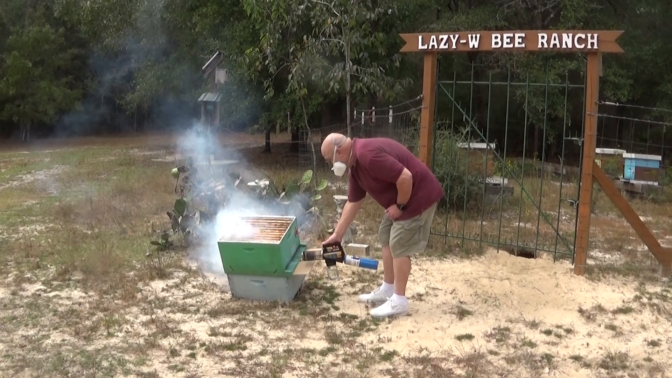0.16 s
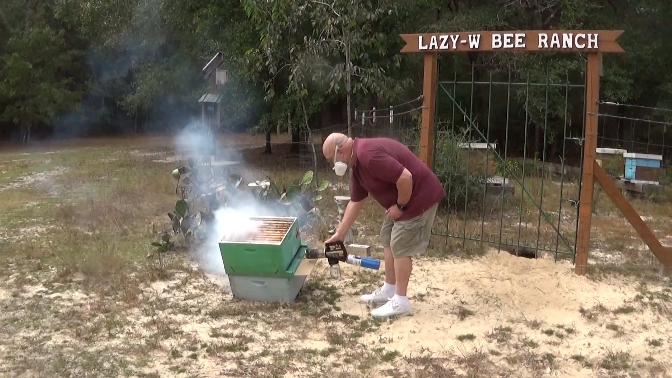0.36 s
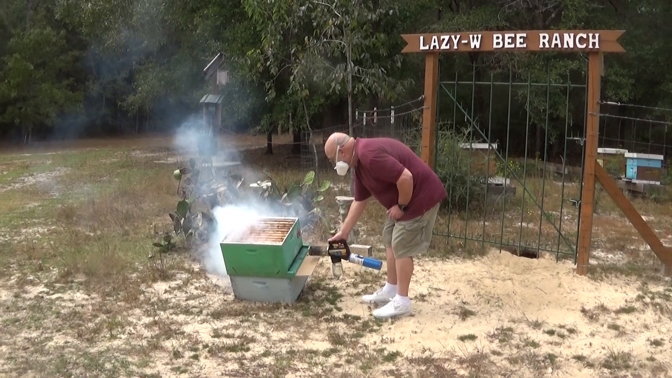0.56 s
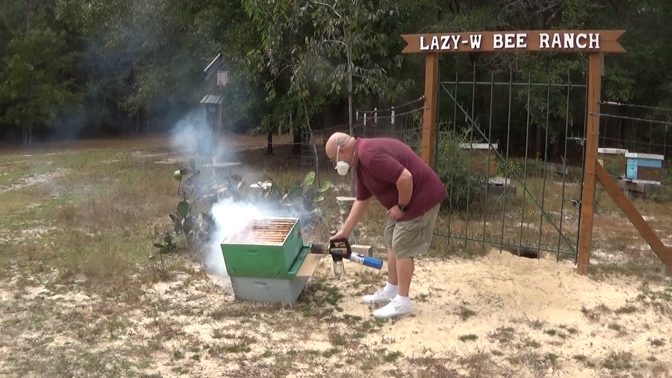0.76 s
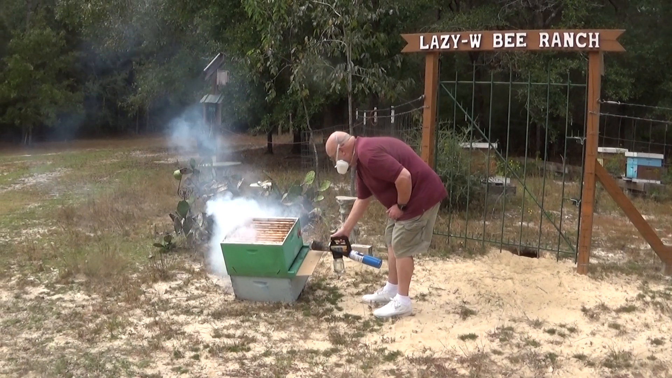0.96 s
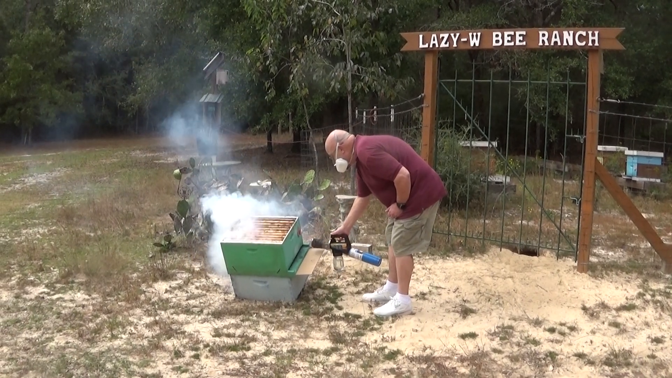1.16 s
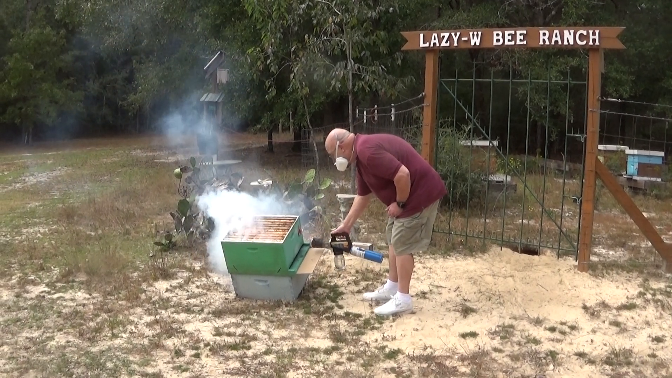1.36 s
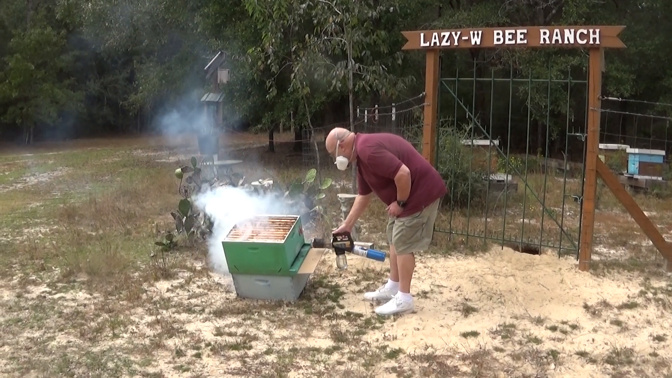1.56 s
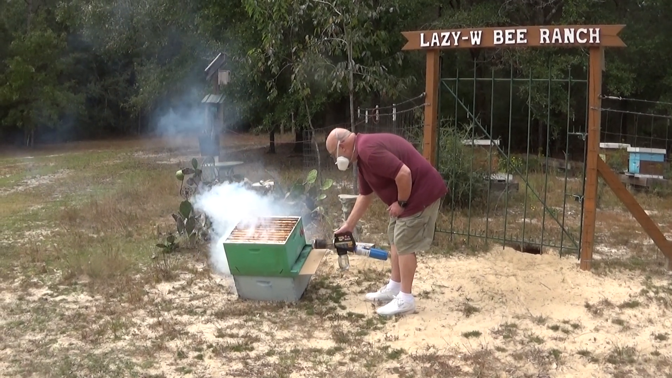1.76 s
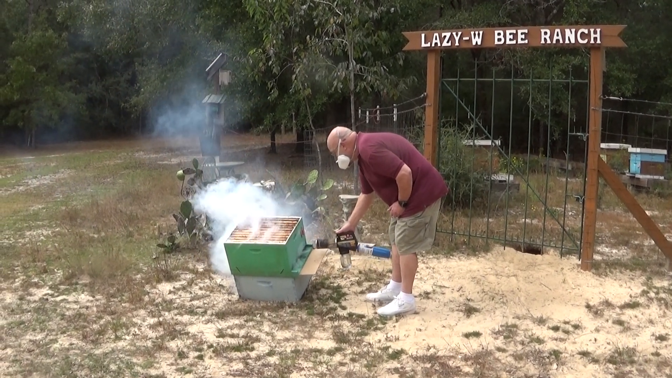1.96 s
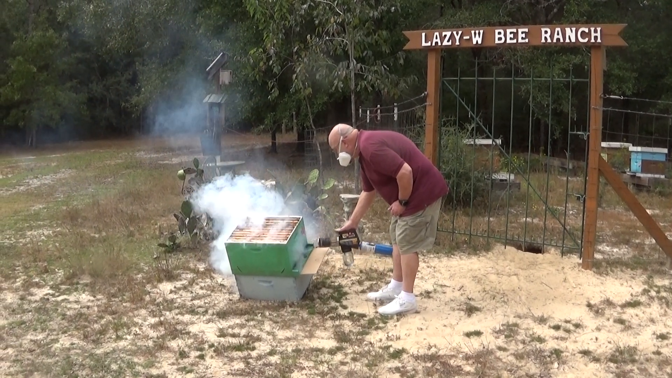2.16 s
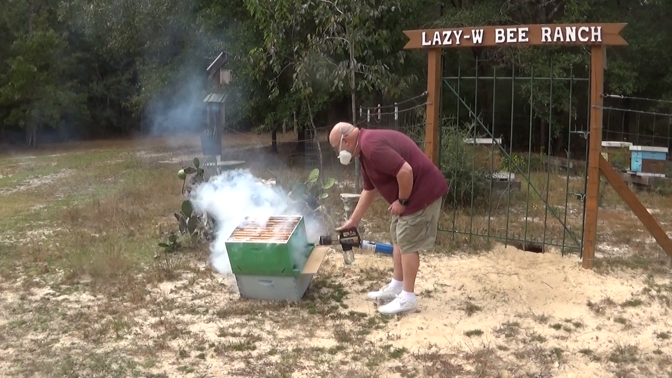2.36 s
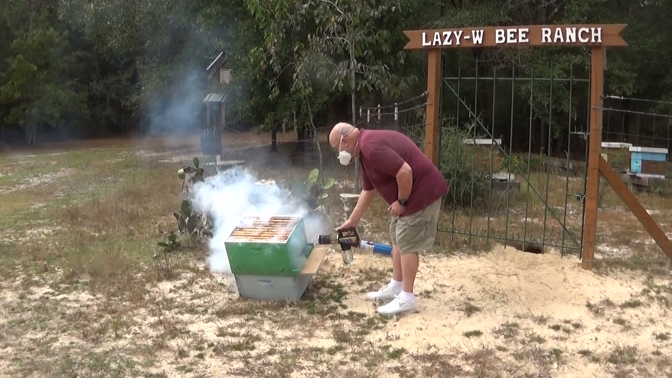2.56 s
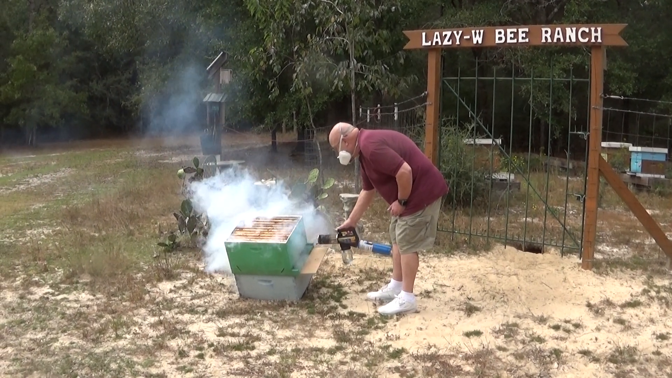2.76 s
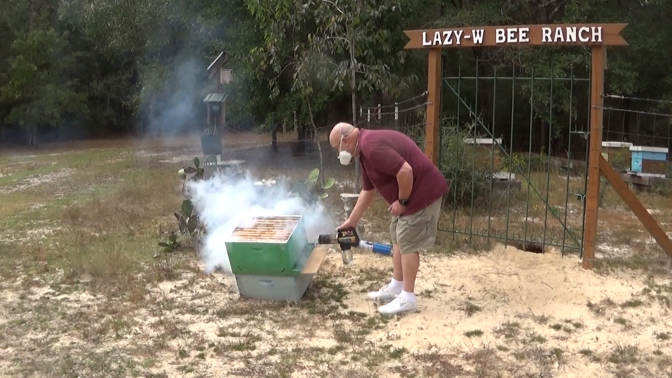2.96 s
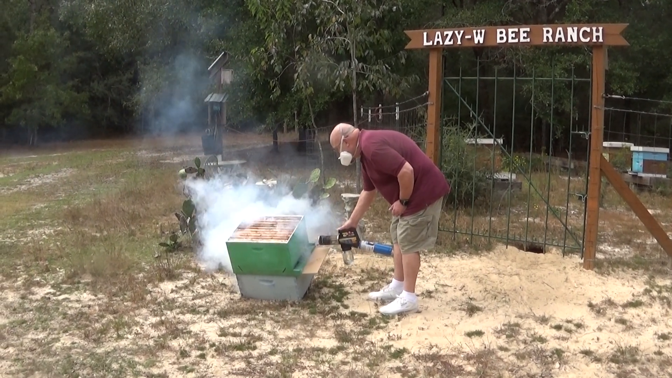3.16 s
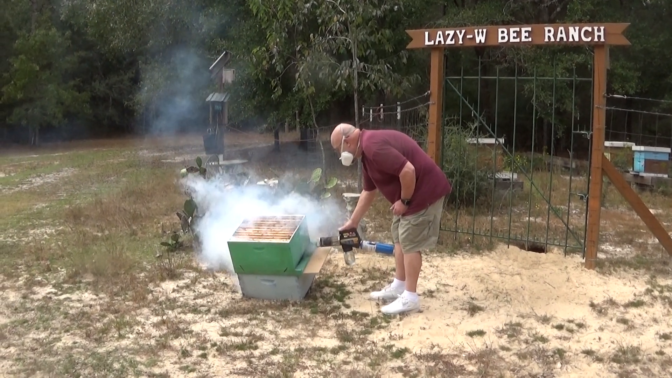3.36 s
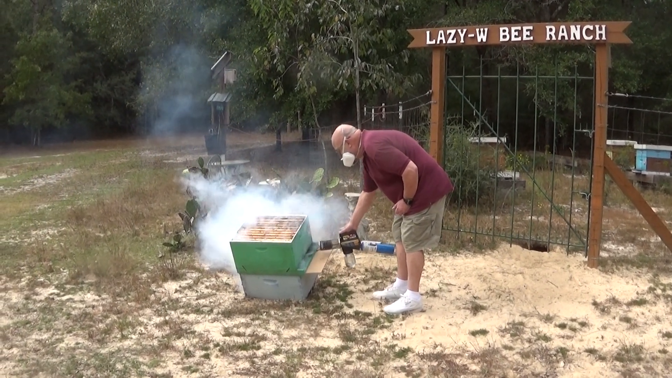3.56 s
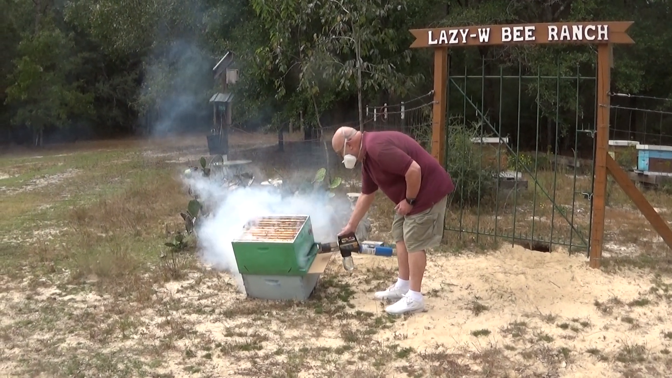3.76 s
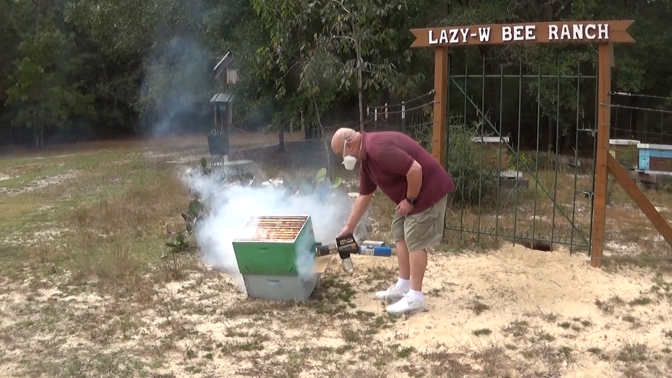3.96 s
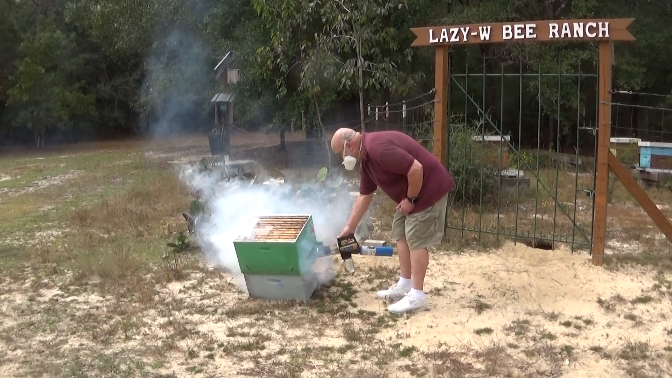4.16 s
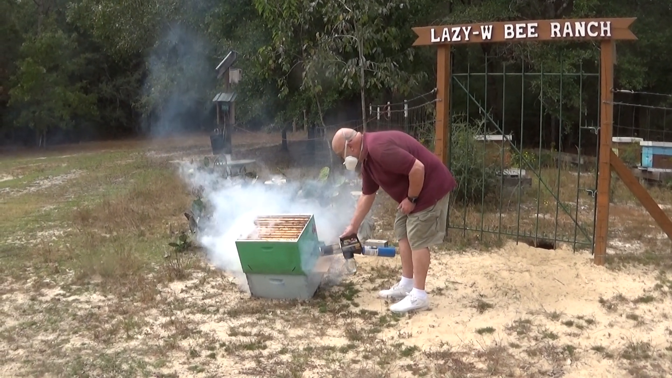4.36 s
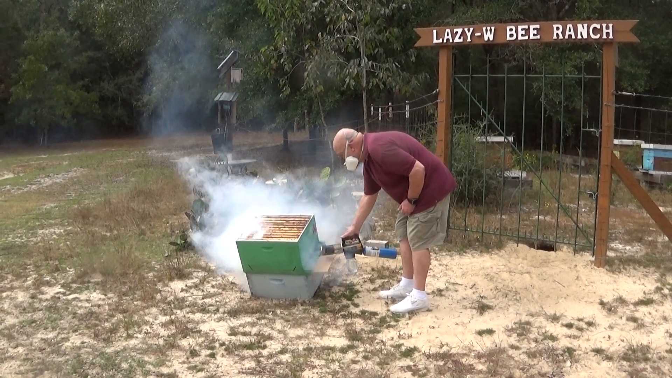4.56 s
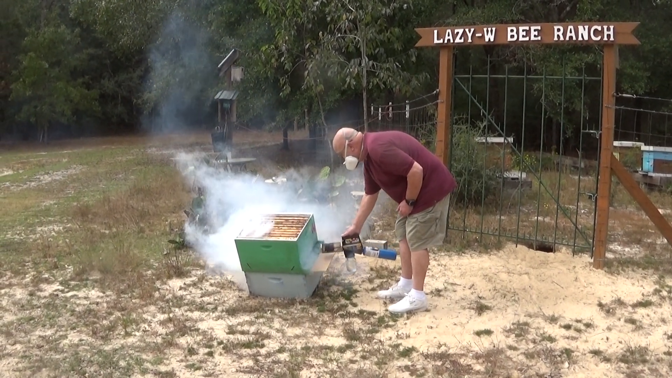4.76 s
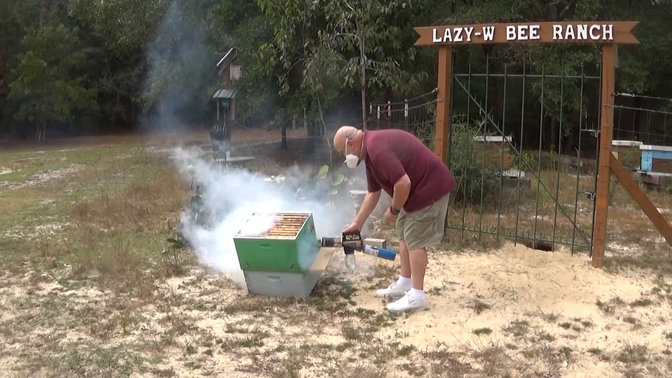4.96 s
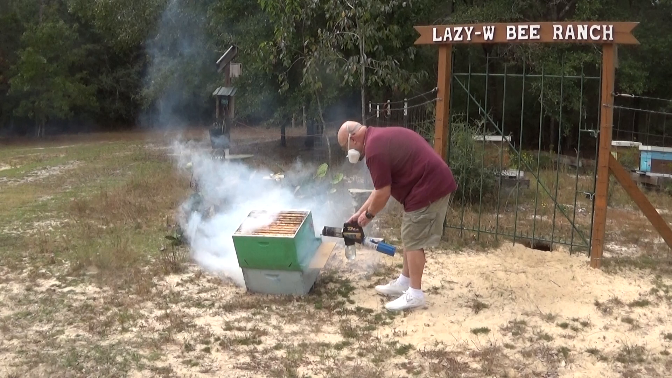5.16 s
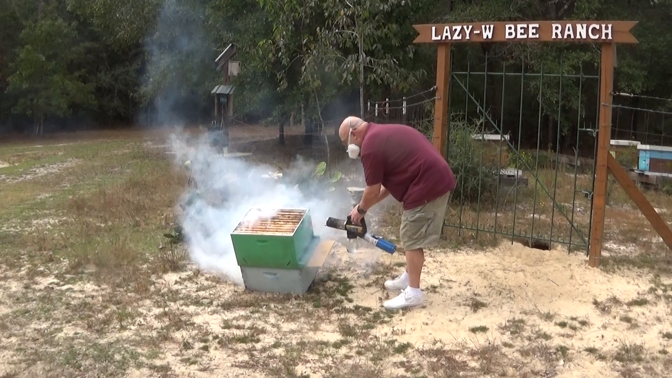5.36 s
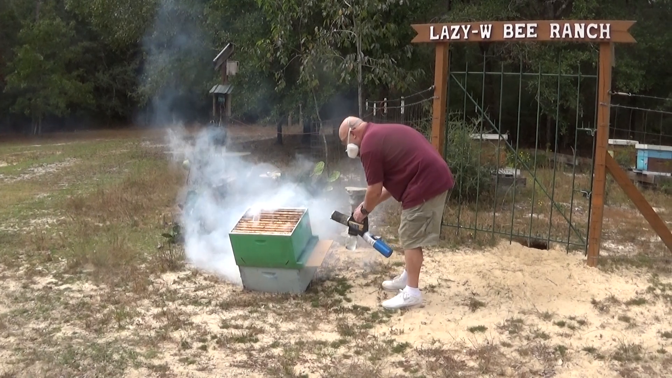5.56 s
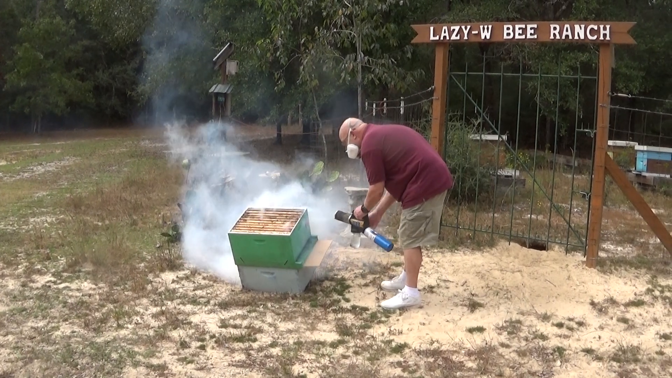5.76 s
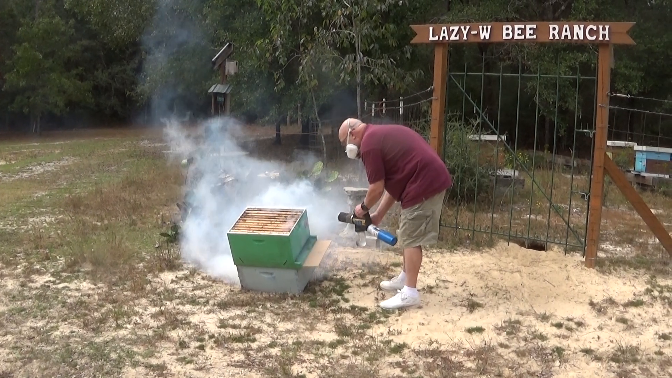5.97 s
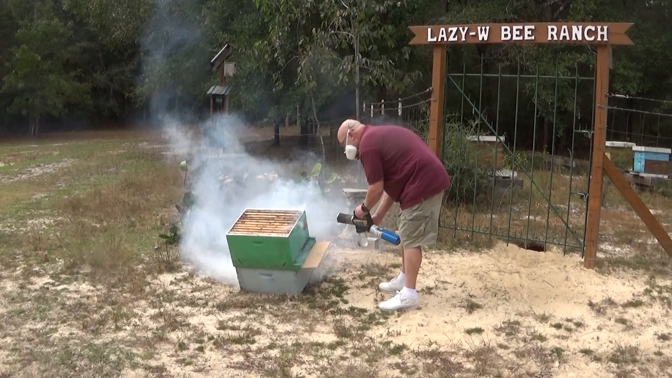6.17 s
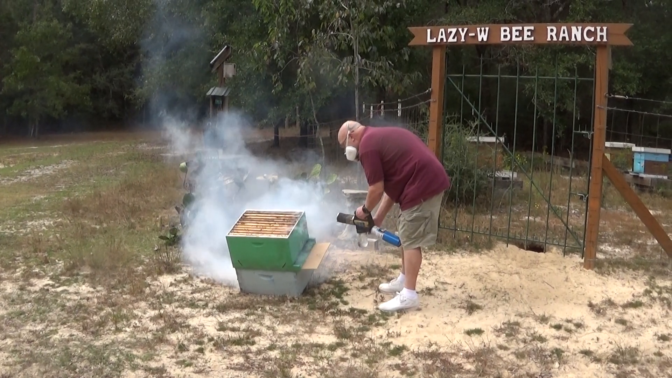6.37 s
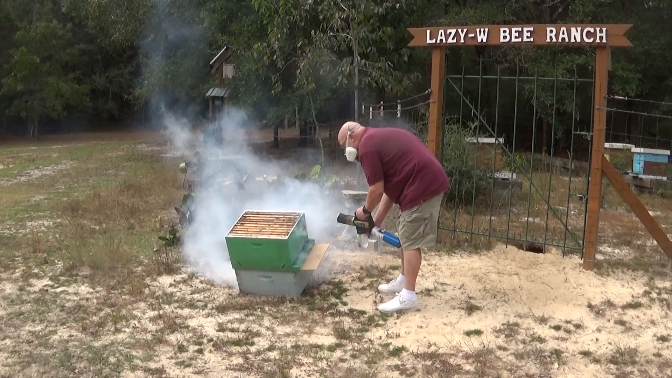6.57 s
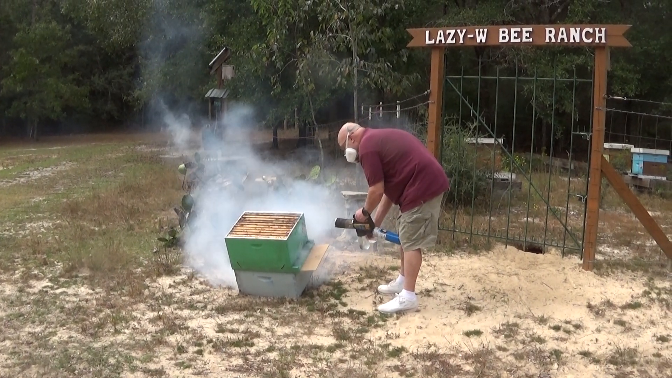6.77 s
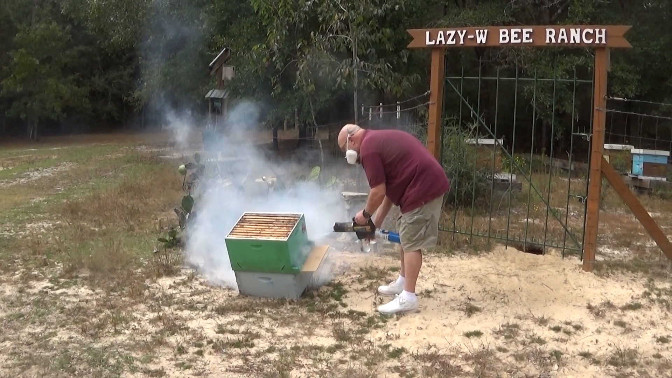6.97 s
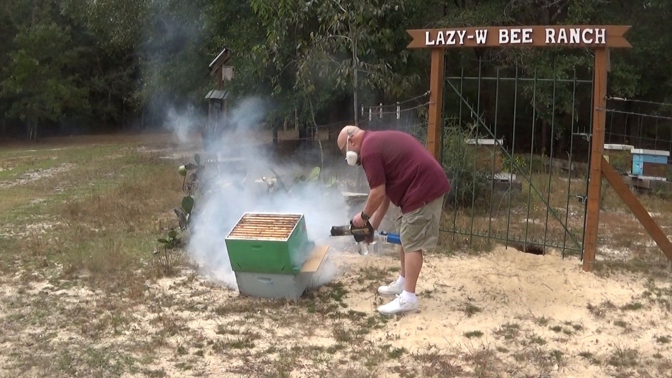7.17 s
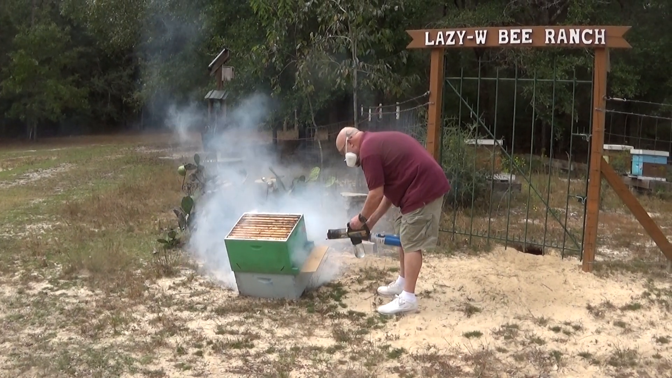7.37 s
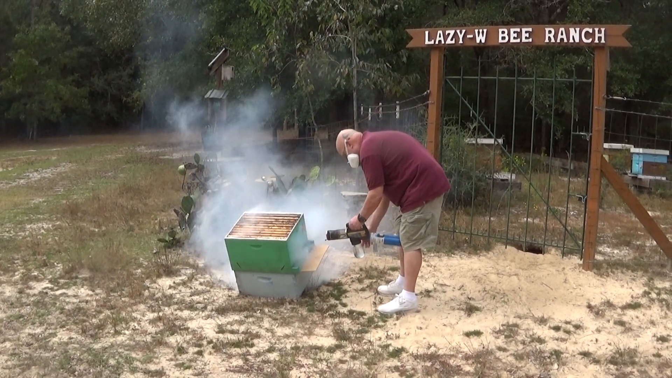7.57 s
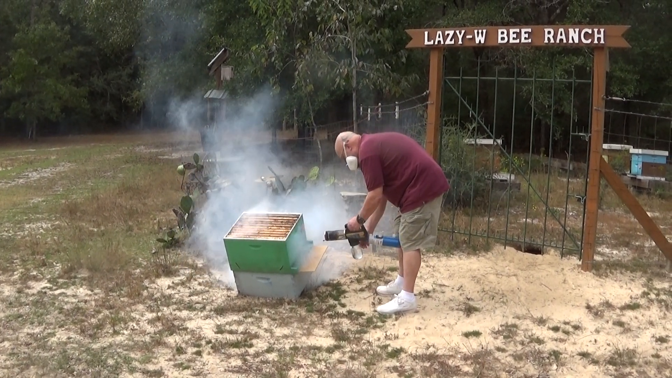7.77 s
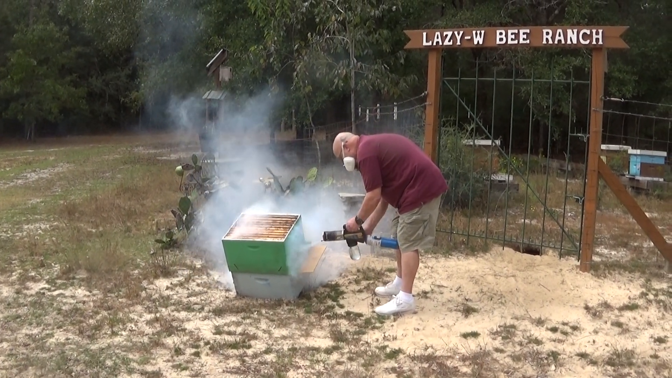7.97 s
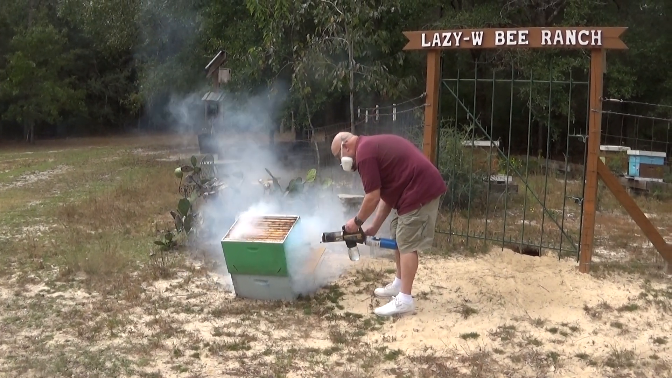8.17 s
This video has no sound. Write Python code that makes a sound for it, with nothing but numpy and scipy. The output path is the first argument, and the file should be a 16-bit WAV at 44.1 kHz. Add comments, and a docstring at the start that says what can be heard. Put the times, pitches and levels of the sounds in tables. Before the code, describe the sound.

A handheld fogger spits loud, hissing jets of hot fog into a hollow wooden hive box, a thin burner whistle trembling throughout outdoors.

```python
"""Thermal fogger at a wooden hive box

Outdoors, a handheld fogger blows hot oil fog into a hive box, then is drawn back from it.
Each pump stroke flashes to a hissing, spitting jet of filtered noise; the hollow box booms with it as resonances.
The burner whistles throughout as a trembling near sine, and bees hum as wavering wing beats with overtones.
Around them the yard is a faint wide wash of noise, unrelated on the two sides, over the flame's low flutter."""
import sys
import numpy as np
from scipy import signal
from scipy.io import wavfile
from scipy.ndimage import map_coordinates

SR = 44100
rng = np.random.default_rng(int(sys.argv[2]) if len(sys.argv) > 2 else 0)


def makeup_ratio(level_db):
    """Linear amplitude ratio for a level in decibels (20 dB per factor of ten)."""
    decades = np.asarray(level_db, float) / 20
    return 10 ** decades


def unload_audio(sound):
    """Save the sound as a 16-bit wav file, at the path given as the first command line argument."""
    columns = np.transpose(np.atleast_2d(sound))
    # keep every value between -1 and 1, then stretch to whole-number steps
    steps = np.round(np.clip(columns, -1, 1) * 32767)
    wavfile.write(sys.argv[1], SR, steps.astype(np.int16))


N = 362938  # samples

# where the nozzle is: start_s, face_echo_ms (off the box), ground_echo_ms, inside_share (1 in the box, 0 out)
NOZZLE_PLACE = [(0, .53, 2.0, 1), (.35, .53, 2.0, 1), (.5, .37, 2.0, 1), (1.0, .37, 2.0, 1),
                (2.0, .53, 2.01, 1), (2.5, .53, 2.015, 1), (2.85, .37, 2.0, 1), (3.6, .37, 2.0, 1),
                (3.8, .61, 2.005, .9), (5.0, .64, 2.02, .85), (5.3, .97, 2.05, .55), (6.3, .98, 2.085, .3),
                (6.8, .93, 2.07, .3), (7.5, .83, 2.03, .05), (8.23, .825, 1.9, 0)]


def rms_one(x):
    """Scale to unit rms."""
    return x / np.sqrt(np.mean(x ** 2) + 1e-20)


def in_time(rows):
    """Columns of a table against its seconds, one value per sample."""
    s, *columns = np.transpose(rows)
    return [np.interp(np.arange(N) / SR, s, c) for c in columns]


def drift(rate_hz):
    """Slow chance: noise through a double one-pole low-pass, run in; spread 1."""
    step = 8  # samples between drawn values
    r = np.exp(-2 * np.pi * rate_hz * step / SR)
    noise = rng.standard_normal(N // step + 4002)
    slow = signal.lfilter([1], [1, -2 * r, r * r], noise)[4000:]
    return np.interp(np.arange(N) / step, np.arange(len(slow)), rms_one(slow))


def resonance(x, hz, width_hz):
    """Two-pole resonance with a gain of about 1 on top."""
    r = np.exp(-np.pi * width_hz / SR)
    top = np.array([1, 0, -1]) * (1 - r * r) / 2
    return signal.lfilter(top, [1, -2 * r * np.cos(2 * np.pi * hz / SR), r * r], x)


def lift(x, modes, share=1):
    """Each mode raises its own neighbourhood of the spectrum."""
    for hz, width_hz, db in modes:
        x = x + share * (makeup_ratio(db) - 1) * resonance(x, hz, width_hz)
    return x


def turbulence(spectrum, gain_db, patchy_db, count=3, channels=1):
    """Bands of noise, about count to the octave; each takes gain_db(hz) in time and flickers on its own."""
    hz_points, db_points = np.transpose(spectrum)
    octaves = np.log2(hz_points[-1] / hz_points[0])
    edges = np.geomspace(hz_points[0], hz_points[-1], int(count * octaves) + 3)
    # neighbouring bands are cut from unrelated noises
    white = rng.standard_normal((2, channels, N))
    flat, out = 0, 0
    for k, (low, high) in enumerate(zip(edges, edges[1:])):
        band_pass = signal.butter(2, [low, high], "band", fs=SR, output="sos")
        band = signal.sosfilt(band_pass, white[k % 2])
        hz = np.sqrt(low * high)
        band = band * makeup_ratio(np.interp(np.log(hz), np.log(hz_points), db_points))
        flat = flat + band
        out = out + band * makeup_ratio(gain_db(hz) + patchy_db * drift(4.15))
    # the steady spectrum has unit rms ahead of the gains
    return out / np.sqrt(np.mean(flat ** 2))


def delayed(x, ms):
    """Read a sound late by a fixed or changing time."""
    return map_coordinates(x, [np.arange(N) - ms * SR / 1000], order=3)


def flow_db():
    """Each stroke rises, holds and fades steadily in dB; stroke powers add up over the idling hiss."""
    # pump strokes and surges of oil: start_s, rise_s, hold_s, level_db, fade_db_per_s
    strokes = [(-0.195, 0.106, 0.054, -30.5, 7), (0.015, 0.097, 0.067, -21, 11.5),
               (0.177, 0.095, 0.19, -20.1, 64), (0.551, 0.06, 0.038, -26.5, 57),
               (0.847, 0.14, 0.017, -32, 56), (1.292, 0.11, 0.11, -22.5, 6.5),
               (1.459, 0.13, 0.43, -22.7, 29), (1.713, 0.043, 0.03, -20.5, 103),
               (2.481, 0.503, 0.077, -29, 9), (3.28, 0.25, 0.084, -19, 28), (3.7, 0.066, 0.02, -22.5, 60),
               (3.6, 0.36, 0.29, -20.9, 17), (4.065, 0.031, 0.005, -22, 14.5),
               (4.433, 0.177, 0.233, -30, 31), (4.962, 0.074, 0.064, -32.5, 24),
               (5.878, 0.28, 0.162, -43, 4), (6.621, 0.41, 0.027, -35, 7), (7.697, 0.043, 0.015, -35.5, 62),
               (7.754, 0.085, 0.719, -26.5, 16)]
    idle_db, rise_power = -44.3, 2.2
    t = np.arange(N) / SR
    power = makeup_ratio(2 * idle_db)
    for start, rise, hold, db, fade_db in strokes:
        up = np.clip((t - start) / rise, 0, 1) ** rise_power
        fading_s = np.maximum(t - start - rise - hold, 0)
        power = power + up * makeup_ratio(2 * (db - fade_db * fading_s))
    return 10 * np.log10(power)


def jet():
    """Boiling oil leaves in uneven slugs: one sputter shakes hiss, roar and boom, each by its own share."""
    # turbulence at the nozzle: pitch_hz, level_db (relative, per Hz)
    hiss_spectrum = [(2500, -15.5), (3600, -12), (4300, -10), (5750, -5), (6700, -5), (7700, 0),
                     (10000, -0.5), (12500, 0), (14000, -1.5), (15300, -9), (17500, -10)]
    # spreading plume: pitch_hz, level_db (relative, per Hz)
    roar_spectrum = [(700, -20), (1000, -2), (1500, -3), (2000, 1.5), (2600, -1.5), (3400, 1), (4500, -9.5)]
    # low noise that sounds the hollow box: pitch_hz, level_db (relative, per Hz)
    boom_spectrum = [(100, -26), (140, -10.5), (200, -5), (330, -14), (500, 2.5), (800, 2), (1200, -12.5)]
    # air modes of the box: pitch_hz, width_hz, lift_db (nozzle fully inside)
    box_modes = [(248.4, 25.4, 14.5), (413, 28, 6.5), (900, 63, 5), (1140, 170, 3), (1564, 220, 5.5),
                 (2124, 140, 3)]
    # tube resonances of the nozzle: pitch_hz, width_hz, lift_db
    nozzle_modes = [(6470, 160, 3), (9000, 350, 2), (10400, 500, 2.5), (12300, 500, 1.5)]
    # slugs of unboiled oil: start_s (their middle), extra_roar_db, length_s
    slugs = [(0.172, 5.5, 0.048), (0.36, 5, .045), (0.53, 5, .045), (0.757, 0.5, 0.033), (0.902, 1.5, .04),
             (1.51, 7.5, 0.049), (1.644, 8, 0.049), (1.796, 5, 0.029), (2.027, 4, .035), (3.065, 4, .06),
             (3.55, 5, .03), (3.648, 4.5, 0.03), (4.87, 1, 0.049), (6.983, 2, .04), (7.927, 1.5, 0.039),
             (8.013, 4, .035), (8.22, -1, 0.04)]
    # the fog: start_s, wetness_db, box_filling_db, hump_hz (loudest pitch of the hiss)
    fog = [(0, -1.5, 3.5, 10600), (.45, -1.5, -2.5, 9500), (.85, 2, -3.5, 9900), (1.25, 2.5, 0.5, 10600),
           (1.45, -1, -2, 10100), (1.9, -1, 3.5, 10400), (2.4, -5, 4, 10700), (2.8, 0, -1, 10030),
           (3.3, -1.2, -3, 9500), (3.7, -3, 0, 9500), (3.8, 2, 6.5, 12300), (4.4, 0, 4.5, 12100),
           (4.85, -2, 7, 12000), (5.15, -5.5, -2, 12100), (5.45, -1.5, 0, 9500), (6.0, -3, -2, 10340),
           (6.85, -4, -.7, 10100), (7.05, -.7, 1, 9800), (7.5, -4, 5, 10300), (7.8, -3, -1.5, 9300),
           (7.95, 2.3, -0.5, 9300), (8.23, 4.2, 3, 9700)]
    # the nozzle swings about: start_s, tilt_db_per_octave (hiss brightness), hump_db (height of the hump)
    aim = [(0, -7.5, 3), (.11, -0.7, 1), (.45, -3, 4), (.65, 0.2, 4.5), (.85, -3, 3), (1.05, .3, 2.5),
           (1.22, -1.5, 4.5), (1.4, -0.5, 5.5), (1.95, -1.1, 1.5), (2.25, -2.2, 6.5), (3.0, 0, 4.5),
           (3.55, -0.1, 1), (3.8, -2.5, 0.5), (4.26, -1.2, 3), (4.95, -2.5, 3.5), (5.15, 2, .7),
           (5.5, 0, 4), (5.9, -0.3, 4), (6.6, -1.2, 3), (6.92, 0, 6.5), (7.5, -4.5, 2.5), (7.86, -2, 0),
           (8.23, -5, 3.5)]
    # levels at the usual hiss, and the share of the hiss swing that roar and boom follow
    usual_db, roar_level_db, boom_level_db = -28, -44, -53.5
    roar_follows, boom_follows = 0.69, 0.52
    # for each dB of a slug: dB of hiss, dB of boom, dB per octave lost by the hiss
    slug_hiss, slug_boom, slug_dulls = 0.037, .55, 0.43
    # roar tilt in dB per octave, nozzle in and out of the box; tilt lost per dB of filling
    tilt_in, tilt_out, fill_deepens = 0.55, 3.5, 0.74
    box_heard_out = .15  # share of the box modes heard with the nozzle out

    t = np.arange(N) / SR
    hiss_db = flow_db()
    swing_db = hiss_db - usual_db
    slug_db = sum(db * np.exp(-((t - s) / length) ** 2) for s, db, length in slugs)
    wet_db, fill_db, hump_hz = in_time(fog)
    aim_tilt, hump_db = in_time(aim)
    inside = in_time(NOZZLE_PLACE)[2]
    hiss_db = hiss_db + slug_hiss * slug_db
    roar_db = roar_level_db + roar_follows * swing_db + wet_db + slug_db
    boom_db = boom_level_db + boom_follows * swing_db + fill_db + slug_boom * slug_db
    hiss_tilt = aim_tilt - slug_dulls * slug_db
    roar_tilt = tilt_out + (tilt_in - tilt_out) * inside - fill_deepens * fill_db
    sputter = 0.39 * drift(14.5) + .5 * drift(39.0) + 0.77 * drift(670.0)

    def hiss_colour(hz):
        """The tilt turns about a fixed pitch; a narrow hump wanders through the treble."""
        hump = hump_db * np.exp(-(np.log2(hz / hump_hz) / 0.12) ** 2)
        return hiss_db + .72 * sputter + hiss_tilt * np.log2(hz / 8960.0) + hump - .9

    def roar_colour(hz):
        """The plume brightens and dulls with the nozzle's place and the filling of the box."""
        return roar_db + 1.1 * sputter + roar_tilt * np.log2(hz / 1770.0)

    hiss = lift(turbulence(hiss_spectrum, hiss_colour, 1.0, count=6), nozzle_modes)
    roar = turbulence(roar_spectrum, roar_colour, 0.9, count=4)
    boom = turbulence(boom_spectrum, lambda hz: boom_db + 0.15 * sputter, 1.36)
    box_share = box_heard_out + (1 - box_heard_out) * inside
    in_box = lift(roar + boom, box_modes, box_share)
    return (hiss + makeup_ratio(-1.5) * in_box)[0]


def spits():
    """Drops crack, fizz out and knock the barrel; small ones crackle at random, as loud as the flow allows."""
    # drops that spit: start_s, crack_db (relative), fizz_ms (decay), knock_db (relative)
    drops = [(4.1522, -4, .3, -40), (4.4748, -10, .3, -35), (6.3795, -11.5, 1.2, -24.5),
             (6.599, -30, 1.2, -32), (6.9995, -13, .5, -34), (7.7445, -17, 4.0, -36),
             (7.7995, -14, .6, -40), (7.834, -16, 2.5, -40), (7.8628, -7, 2.5, -30), (7.8798, -2, .4, -34),
             (8.007, -10, .6, -30)]
    # colour of a crack: pitch_hz, width_hz, level_db
    crack_colour = [(4500, 2000, -4), (8000, 3000, 0), (12500, 3500, -2)]
    # ring of the barrel: pitch_hz, width_hz, level_db
    barrel = [(910, 210, -14.5), (1900, 430, -3.5)]
    noise = rng.standard_normal((len(drops), 800))
    t_ms = np.arange(800) / SR * 1000
    # about 80 small drops a second, either sign
    falls = rng.random(N) < 80.0 / SR
    size_db = 3.0 * np.minimum(rng.exponential(1, N), 2)
    small = falls * makeup_ratio(size_db) * rng.choice([-1, 1], N)
    burst = small * makeup_ratio(flow_db() + 11)
    blows = np.zeros(N)
    for (s, db, ms, knock_db), grain in zip(drops, noise):
        start = round(s * SR)
        burst[start] += makeup_ratio(db + 7)
        burst[start:start + len(t_ms)] += makeup_ratio(db - 3) * np.exp(-t_ms / ms) * grain
        # the knock follows one fizz time later
        blows[start + round(ms * SR / 1000)] = makeup_ratio(knock_db)
    out = np.zeros(N)
    for k, (hz, width_hz, db) in enumerate(crack_colour):
        out += makeup_ratio(db) * resonance(burst + 1e-18, hz, width_hz) * (-1) ** k
    for hz, width_hz, db in barrel:
        # a resonance answers a click with a height of about 2 pi width / SR
        out += makeup_ratio(db) * resonance(blows + 1e-18, hz, width_hz) * SR / (2 * np.pi * width_hz)
    return out


def reflections(x):
    """Bounces off the wooden face and the ground comb the jet as the nozzle moves; fence and trees scatter it."""
    face_in, face_out, ground = .21, .72, .2  # echo shares; face with the nozzle in and out of the box
    face_ms, ground_ms, inside = in_time(NOZZLE_PLACE)
    face = face_out + (face_in - face_out) * inside
    # a dull bounce off the small face, which the bass passes round, and a thin one off the ground
    dull_band = signal.butter(1, [700, 5000], "band", fs=SR, output="sos")
    thin_band = signal.butter(1, [2000, 9000], "band", fs=SR, output="sos")
    face_echo = face * delayed(signal.sosfiltfilt(dull_band, x), face_ms)
    ground_echo = ground * delayed(signal.sosfiltfilt(thin_band, x), ground_ms)
    centre = (x + face_echo + ground_echo) / np.sqrt(1 + face ** 2 / 2)
    # fence and trees answer from the sides, opposite in sign left and right
    far_band = signal.butter(4, [2200, 9500], "band", fs=SR, output="sos")
    far = signal.sosfilt(far_band, x)
    scatter = makeup_ratio(-25 + 2.0 * drift(9.2)) * (delayed(far, 7.3) - delayed(far, 11.9))
    return np.array([centre + scatter, centre - scatter])


def whistle():
    """An edge tone: a near sine, trembling in pitch and strength, with a weak octave and a skirt of breath."""
    # burner whistle: start_s, pitch_hz, level_db (relative)
    burner = [(0, 3240, -41), (.45, 3225, -45), (.75, 3285, -40), (.94, 3260, -43), (1.03, 3335, -41),
              (1.08, 3305, -41), (1.15, 3345, -41), (1.24, 3265, -40), (1.46, 3248, -39), (1.6, 3265, -41),
              (1.85, 3270, -37), (2.03, 3325, -37), (2.12, 3290, -38), (2.4, 3300, -38), (2.7, 3262, -39),
              (3.37, 3265, -39.5), (3.82, 3330, -41.5), (4.0, 3290, -41.5), (4.35, 3285, -37.5),
              (4.6, 3305, -40), (4.86, 3332, -38.5), (5.1, 3275, -35), (5.24, 3320, -35), (5.36, 3285, -40),
              (5.44, 3250, -37), (5.72, 3235, -41.5), (5.9, 3275, -40), (6.15, 3245, -43.5),
              (6.45, 3272, -41), (6.8, 3252, -44), (7.0, 3262, -40.5), (7.18, 3320, -36), (7.34, 3262, -35),
              (7.45, 3300, -34), (7.51, 3490, -36), (7.57, 3460, -35), (7.74, 3482, -35.5),
              (7.8, 3526, -36), (7.93, 3362, -35), (8.03, 3374, -35), (8.07, 3406, -34), (8.18, 3265, -35),
              (8.23, 3285, -35)]
    hz, db = in_time(burner)
    wander_hz = 13.0 * drift(12.0) + 12.0 * drift(35.0) + 21.0 * drift(180.0)
    phase = 2 * np.pi * np.cumsum(hz + wander_hz) / SR
    strength = makeup_ratio(db - 0.27 + 1.0 * drift(13.0) + 1.1 * drift(120.0))
    breath = makeup_ratio(-15) * drift(147.0) * np.sin(phase + 2 * np.pi * rng.random())
    tone = np.sqrt(2) * strength * (np.sin(phase) + breath)
    octave = makeup_ratio(-21) * strength * np.sin(2 * phase + 1.1 * drift(120.0))
    # the tone sits a little right of the jet: later and weaker on the left
    left = delayed(tone, .011) * makeup_ratio(-0.5)
    right = tone * makeup_ratio(2.0)
    return np.array([left, right]) + octave


def bees():
    """Each bee is a wavering wing beat with two overtones, swelling in and out."""
    # bees on the wing: start_s, end_s, wing_beat_hz, level_db (peak of the fundamental, before its flutter)
    flights = [(4.7, 7.0, 248, -62.5), (6.3, 7.9, 212, -64), (7.0, 8.3, 190, -69)]
    t, out = np.arange(N) / SR, np.zeros(N)
    for start, end, hz, db in flights:
        phase = 2 * np.pi * np.cumsum(hz + 1.22 * drift(4.9)) / SR
        near = np.clip(np.minimum(t - start, end - t) / 0.28, 0, 1)
        hum = np.sin(phase) + .2 * np.sin(2 * phase) + .1 * np.sin(3 * phase)
        out += makeup_ratio(db + 1.2 * drift(3.0)) * near * hum
    return out


def yard():
    """Far leaves and air, unrelated on the two sides, over the low flutter of the flame."""
    # leaves and air: pitch_hz, level_db (relative, per Hz)
    wash_spectrum = [(60, -26), (150, -39), (400, -16.5), (1000, -16.5), (1600, -17), (2400, -21.5),
                     (4000, -34)]
    # flame: pitch_hz, level_db (relative, per Hz)
    flame_spectrum = [(35, -30), (60, -17), (100, -7.5), (200, 2.5), (300, -1.5), (450, 1)]
    wash = turbulence(wash_spectrum, lambda hz: -59, 0.6, channels=2)
    flame = turbulence(flame_spectrum, lambda hz: -62, .9)
    return wash + flame


def scene():
    """The fogger stands in the middle, its whistle a little right, the yard all round."""
    return reflections(jet() + spits()) + whistle() + bees() + yard()


def band_limit(x):
    """A steep low-pass at the top of the band."""
    return signal.sosfilt(signal.butter(12, 16930, fs=SR, output="sos"), x)


def record(dry):
    """A close stereo pair; the treble of the finished mix ends steeply at 15780 Hz."""
    treble_end = signal.ellip(12, .3, 75, 15780, fs=SR, output="sos")
    mix = signal.sosfilt(treble_end, dry)
    return band_limit(mix)


dry = scene()
out = record(dry)
unload_audio(out)
```